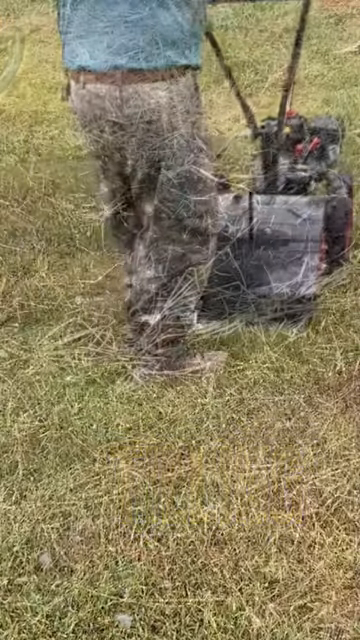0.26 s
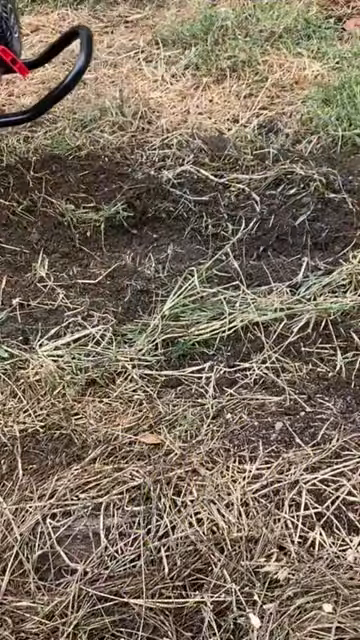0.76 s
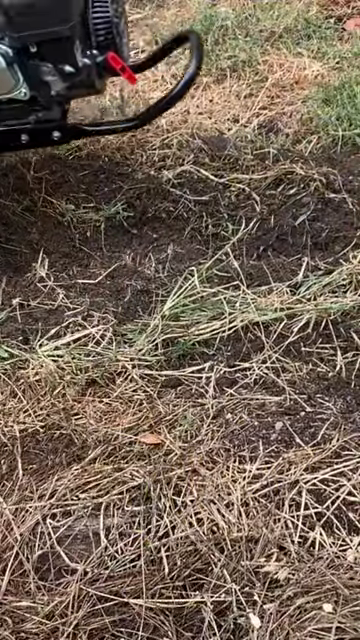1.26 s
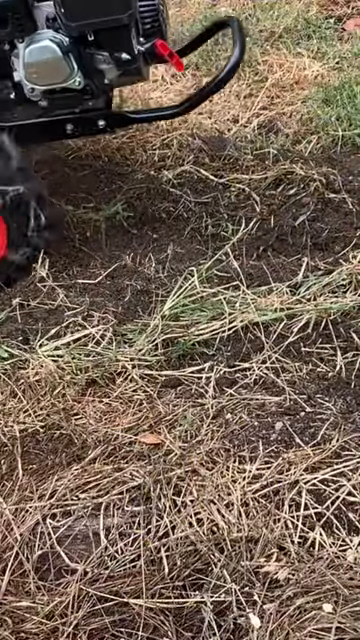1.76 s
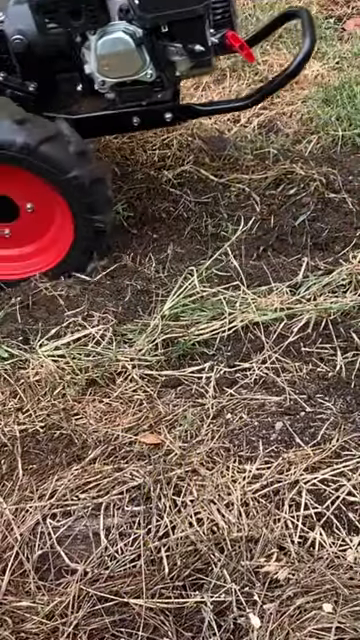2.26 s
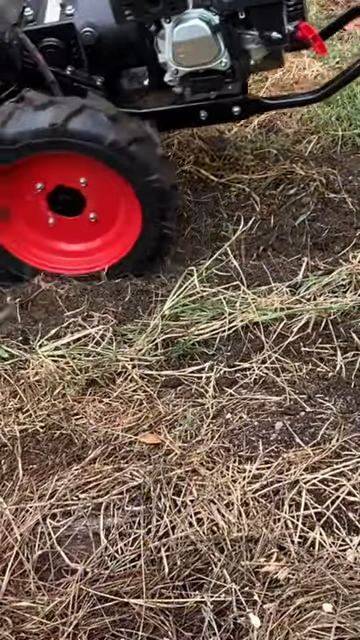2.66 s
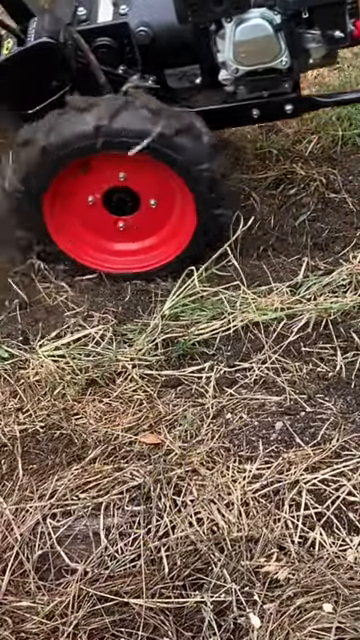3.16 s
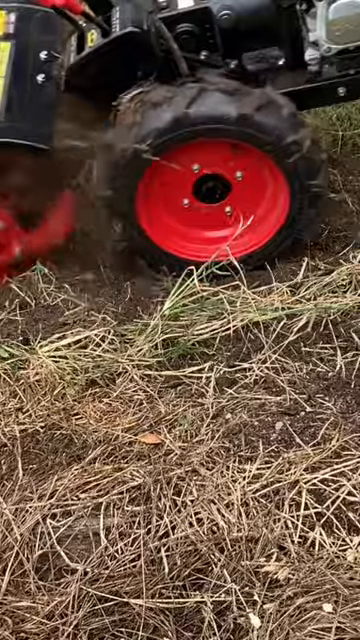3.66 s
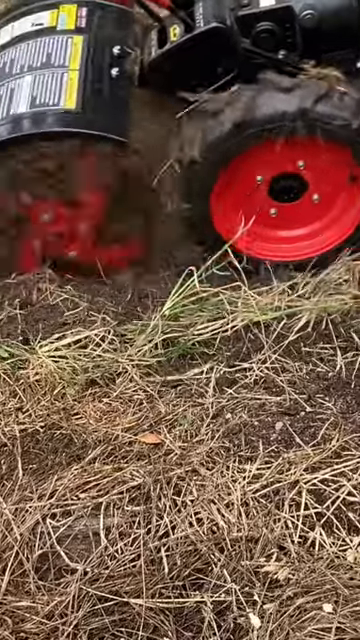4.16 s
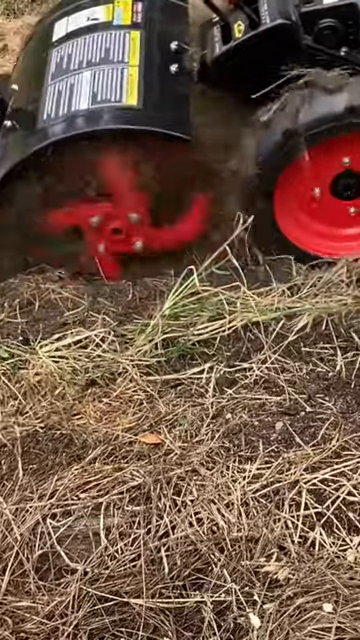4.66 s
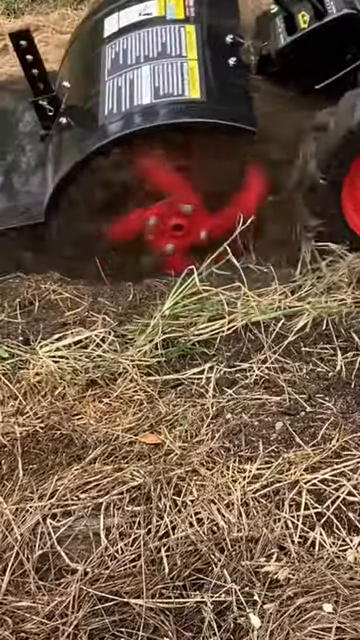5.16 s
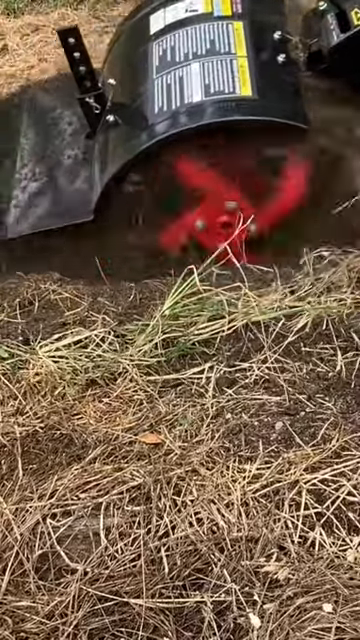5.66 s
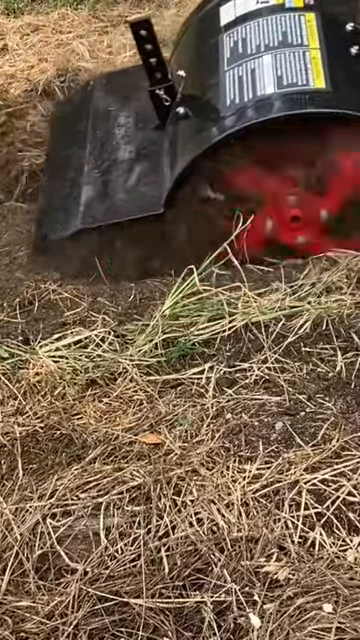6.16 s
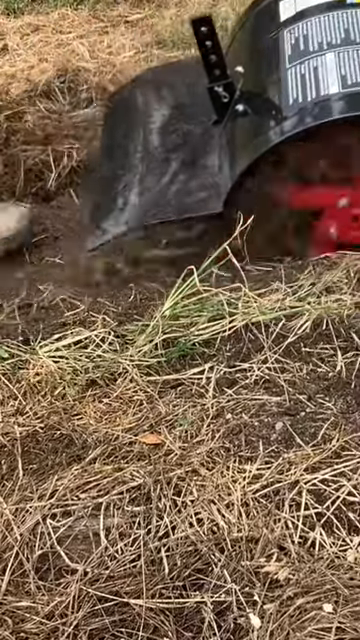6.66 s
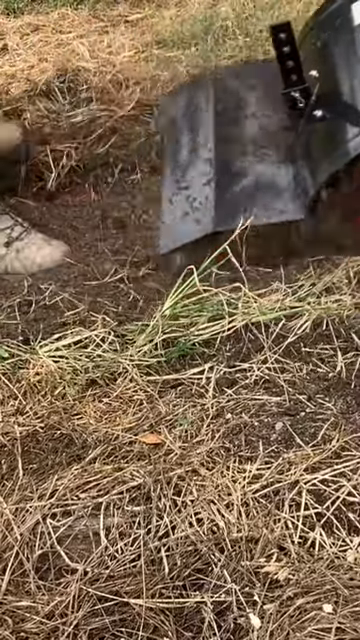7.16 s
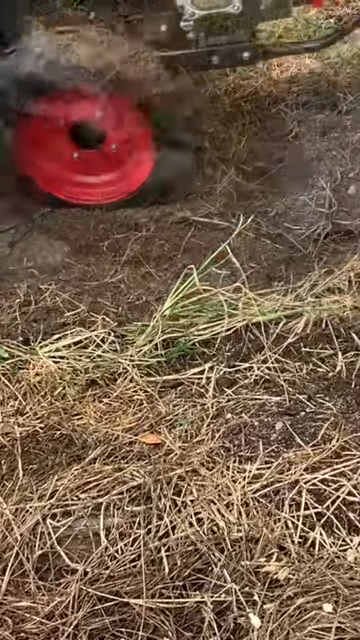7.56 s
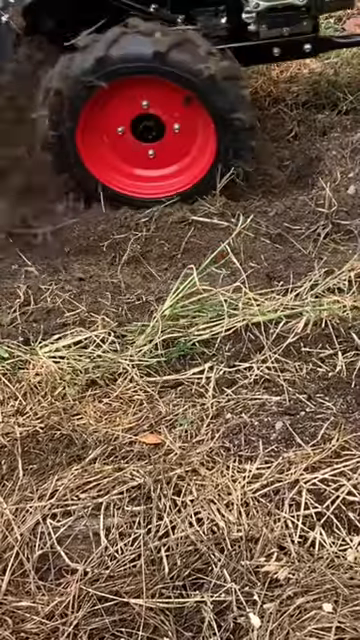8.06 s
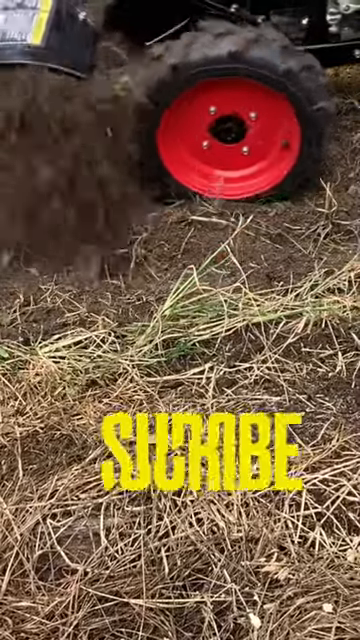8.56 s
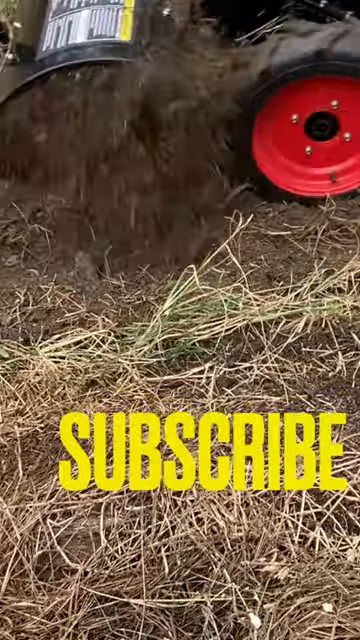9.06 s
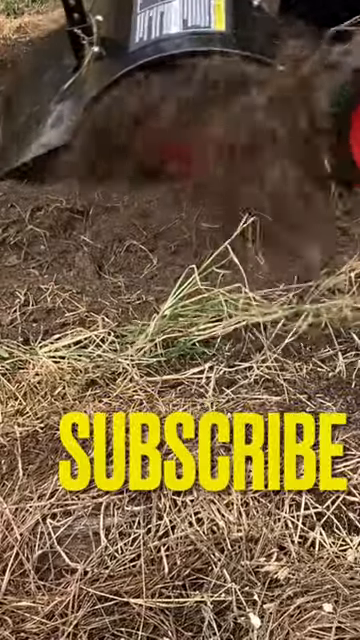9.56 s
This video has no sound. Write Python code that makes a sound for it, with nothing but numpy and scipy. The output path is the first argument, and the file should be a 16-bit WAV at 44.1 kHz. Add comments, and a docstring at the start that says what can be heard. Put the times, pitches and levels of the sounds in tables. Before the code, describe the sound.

A small four-stroke garden tiller works dry grass and soil very near a small stereo microphone. After half a second of low exhaust putter, its steady rapid chug turns harsh and rattly. Grit hisses over it, with scattered clanks, two or three hard early strikes and brief raspy scrapes. Near the end a second close pass fades in stronger, with denser knocks. Dry open air, never stopping.

```python
"""Tiller on dry grass

A single-cylinder four-stroke tiller is heard from behind, then passes close twice; the three scenes cross-fade.
Each firing puffs gas through the muffler, cracks, and knocks the sheet metal into a rattle.
Tines throw soil, straw and stones: grains hiss, and blows ring the guard's modes.
A two-port microphone colours it all; its gain control dips after loud strikes."""
import sys
import numpy as np
from scipy import signal
from scipy.fft import rfft, irfft
from scipy.io import wavfile
from scipy.ndimage import uniform_filter1d

SR = 44100
rng = np.random.default_rng(int(sys.argv[2]) if len(sys.argv) > 2 else 0)


def unload_wav(signal):
    """Save mono or channel-first audio to the path in sys.argv[1] as 16-bit WAV at rate SR, clipped to [-1, 1]."""
    wavfile.write(
        sys.argv[1],
        SR,
        np.round(np.clip(np.atleast_2d(signal).T, -1, 1) * 32767).astype(np.int16),
    )


N = 432621
TIME = np.arange(N) / SR
BINS_HZ = np.arange(N // 2 + 1) * SR / N

# cross-fades from each scene to the next: start_s, end_s
FADES = ((.17, 0.55), (7.3, 7.66))
# colour of grit and straw on the guard: pitch_hz, level_db (relative, per Hz)
SPRAY_COLOUR = [(1760, -32), (3000, -3), (3640, 2.5), (4350, -5), (5420, -4.5), (8380, 2.5), (9460, 5.5),
                (10900, 2.5), (11900, -22), (13200, -5.5), (15300, -6.5), (16200, -27), (16500, -43)]


def from_db(db):
    """Gain of a dB value."""
    return 10 ** (np.asarray(db) / 20)


def rms_one(x):
    """Scale to rms 1."""
    return x / np.sqrt(np.mean(x ** 2) + 1e-20)


def at_bins(points):
    """Read a (Hz, value) table on a log axis at every FFT bin."""
    hz, value = np.transpose(points)
    return np.interp(np.log(BINS_HZ + 1), np.log(hz + 1), value)


def along(curve):
    """Read the columns of a (s, ..) table at every sample."""
    s, *columns = np.transpose(curve)
    return [np.interp(TIME, s, column) for column in columns]


def colour(x, spectrum):
    """Filter by a smooth spectrum given as (Hz, dB)."""
    return irfft(rfft(x) * from_db(at_bins(spectrum)), N)


def ring(clicks, hz, t60):
    """A two-pole resonance: each unit click starts a sine of height 1 that dies by 60 dB in t60 seconds."""
    radius = from_db(-60 / (t60 * SR))
    angle = 2 * np.pi * hz / SR
    # the tiny offset keeps the filter out of denormal numbers
    return signal.lfilter([0, np.sin(angle)], [1, -2 * radius * np.cos(angle), radius ** 2], clicks + 1e-18)


def dying(clicks, t60):
    """Each click becomes an envelope that jumps up and dies by 60 dB in t60 seconds."""
    return signal.lfilter([1], [1, -from_db(-60 / (t60 * SR))], clicks + 1e-18)


def drift(rate_hz):
    """Slow random wander of rms 1: noise smoothed by two equal poles at a fortieth of the sample rate."""
    pole = np.exp(-80 * np.pi * rate_hz / SR)
    noise = rng.standard_normal(N // 40 + 2002)
    slow = signal.lfilter([1], [1, -2 * pole, pole ** 2], noise)[2000:]  # settled part only
    return np.interp(np.arange(N) / 40, np.arange(len(slow)), rms_one(slow))


def clicks_at(seconds, sizes):
    """Single-sample clicks of given sizes at given times."""
    at = np.round(seconds * SR).astype(int)
    inside = (at >= 0) & (at < N)
    out = np.zeros(N)
    np.add.at(out, at[inside], sizes[inside])
    return out


def grains(per_s, spread_db):
    """Random clicks of either sign and uneven size, scaled to rms 1."""
    sizes = from_db(spread_db * np.minimum(rng.exponential(1, N), 5))
    sizes = sizes * rng.choice([-1, 1], N)
    return rms_one(sizes * (rng.random(N) < per_s / SR))


def firings(speed, first_cycles):
    """The engine fires whenever its summed speed completes a cycle, a little early or late as tines bite unevenly."""
    hunt_ms = 0.3  # rms
    s, per_s = np.transpose(speed)
    t = np.arange(s[0], s[-1], 1 / SR)
    cycles = np.cumsum(np.interp(t, s, per_s)) / SR
    before = s[0] - (1 - first_cycles) / per_s[0]
    even = np.r_[before, np.interp(np.arange(first_cycles, cycles[-1]), cycles, t)]
    return even + hunt_ms / 1000 * np.interp(even, TIME, drift(4))


def scenes():
    """Firing times and equal-power cross-fade gain of each of the three scenes."""
    # engine speed heard from behind: time_s, firings_per_s
    speed_behind = [(0.0, 25.42), (0.55, 25.25)]
    # engine speed on the first close pass: time_s, firings_per_s
    speed_pass_one = [(0.3, 24.57), (0.8, 23.72), (1.07, 22.18), (1.3, 24.16), (1.85, 24.79), (2.4, 22.81),
                      (2.75, 24.21), (3.45, 23.96), (3.73, 21.17), (4.05, 23.86), (4.3, 23.38), (4.9, 23.8),
                      (5.25, 24.06), (5.85, 23.69), (6.86, 23.66), (7.55, 18.67)]
    # engine speed on the second close pass: time_s, firings_per_s
    speed_pass_two = [(7.3, 23.56), (7.7, 24.53), (8.1, 24.22), (8.5, 23.63), (8.75, 24.16), (9.3, 24.28),
                      (9.81, 24.81)]
    # how far each scene's speed runs before its first whole firing: behind_cycles, one_cycles, two_cycles
    first_firing = (.355, .295, .833)
    second, third = (np.interp(TIME, fade, [0, np.pi / 2]) for fade in FADES)
    gains = np.cos(second), np.sin(second) * np.cos(third), np.sin(third)
    speeds = speed_behind, speed_pass_one, speed_pass_two
    return [(firings(speed, first), gain) for speed, first, gain in zip(speeds, first_firing, gains)]


def exhaust(fired, puffs, muffler, puff_db=1.0):
    """Gas puffs of every cycle, uneven in strength, ring the muffler's modes; rms 1 while running."""
    cycle_db = -0.05  # spread shared by all puffs of a cycle; puff_db is the spread of each puff
    chance = rng.standard_normal((len(fired), len(puffs) + 1))
    strength = from_db(cycle_db * chance[:, :1] + puff_db * chance[:, 1:])
    gas = sum(clicks_at(fired + ms / 1000, size * strength[:, k]) for k, (ms, size) in enumerate(puffs))
    sound = sum(size * ring(gas, hz, t60) for hz, size, t60 in muffler)
    start, stop = int(max(fired[0], 0) * SR), int(fired[-1] * SR)
    return sound / np.std(sound[start:stop])


def thumping(behind, one, two):
    """Exhaust of the three scenes, stronger from behind where the outlet points."""
    # gas puffs from behind: after_firing_ms, signed_strength
    puffs_behind = [(3.2, -0.091), (7.96, -0.31), (13.2, -0.073), (19.0, 0.19)]
    # muffler modes from behind: pitch_hz, signed_strength, t60_s
    muffler_behind = [(66, -0.094, 0.11), (146, 0.27, 0.033), (247, 0.05, 0.12), (610, 0.04, 0.0072)]
    # gas puffs close by: after_firing_ms, signed_strength
    puffs_beside = [(.57, .95), (3.64, -1.83), (12.7, -1.1), (13.56, 1.8), (32.05, .57)]
    # muffler modes close by: pitch_hz, signed_strength, t60_s
    muffler_beside = [(66, -.3, .15), (102, .51, .082), (168, -1.32, .009), (300, -.11, .11),
                      (700, -.2, .008)]
    thump_behind = from_db(4.5) * exhaust(behind[0], puffs_behind, muffler_behind, puff_db=-0.3)
    thump_one = exhaust(one[0], puffs_beside, muffler_beside)
    thump_two = exhaust(two[0], puffs_beside, muffler_beside)
    return behind[1] * thump_behind + one[1] * thump_one + two[1] * thump_two


def knocking(fired):
    """One click for each blow that shakes the sheet metal in a cycle, uneven in time and strength."""
    # blows of one cycle: after_firing_ms, level_db, cycle_to_cycle_spread_db
    knock_table = [(-6, -10.5, 5), (0.5, -6.5, 1.5), (13, -28, -1.5)]
    jitter_ms = 0.18
    chance = rng.standard_normal((len(fired), len(knock_table), 2))
    out = 0
    for k, (ms, db, spread_db) in enumerate(knock_table):
        late_ms = ms + jitter_ms * chance[:, k, 0]
        out = out + clicks_at(fired + late_ms / 1000, from_db(db + spread_db * chance[:, k, 1]))
    return out


def rattle(knocks):
    """Each knock is a dying noisy shake over a chatter of loose parts; the engine shroud rings with both."""
    # resonances of the engine shroud: pitch_hz, width_hz, level_db
    casing = [(1070, 120, -6), (1485, 28, 0.5), (2510, 47, -2)]
    # colour of the rattle: pitch_hz, level_db (relative, per Hz)
    rattle_colour = [(150, -8.5), (330, -3), (600, -2), (1300, 0), (2230, -4.5), (2900, -9), (3620, -15.5),
                     (4370, -8), (5600, -49)]
    steady_db, shroud_db = -8, 0.5
    chatter = grains(per_s=4000, spread_db=2.0) * from_db(steady_db + 2.0 * drift(12))
    shaken = rng.standard_normal(N) * dying(knocks, t60=0.055) + chatter
    shroud = sum(from_db(db) * signal.lfilter(*signal.iirpeak(hz, hz / width, fs=SR), shaken)
                 for hz, width, db in casing)
    return rms_one(colour(shaken + from_db(shroud_db) * shroud, rattle_colour))


def spray(knocks):
    """Grit and straw pelt the guard in clumps; loose parts buzz with each knock."""
    steady_db, clumps_db = -7, 5.5
    pelting = grains(per_s=7000, spread_db=3.5) * from_db(steady_db + clumps_db * drift(25))
    buzz = rng.standard_normal(N) * dying(knocks, t60=0.1)
    return rms_one(colour(pelting + buzz, SPRAY_COLOUR))


def cooling_air():
    """Smooth noise of the cooling air, brighter than the spray; rms 1."""
    # treble tilt over the spray's colour: pitch_hz, level_db
    hiss_tilt = [(9000, -2), (13000, 0)]
    return rms_one(colour(colour(rng.standard_normal(N), SPRAY_COLOUR), hiss_tilt))


def part_ringing(fired, ms, hz, t60, jitter_ms=0.31, spread_db=4.0):
    """A part struck once a cycle rings, a little uneven in time; the blow has an upper limit."""
    chance = rng.standard_normal((len(fired), 2))
    sizes = from_db(spread_db * np.minimum(chance[:, 1], 1))
    return ring(clicks_at(fired + (ms + jitter_ms * chance[:, 0]) / 1000, sizes), hz, t60)


def popping(cylinder):
    """Short decaying tones of parts that ring at nearly fixed moments of each cycle."""
    # ringing parts: after_firing_ms, pitch_hz, t60_s, level_db (relative)
    pop_table = [(0.97, 630, 0.012, 3), (30, 475, 0.013, -2), (-0.5, 790, 0.035, -3),
                 (-1, 660, 0.047, -25.5)]
    return sum(gain * from_db(db) * part_ringing(fired, ms, hz, t60, jitter_ms=0.06, spread_db=1.5)
               for fired, gain in cylinder for ms, hz, t60, db in pop_table)


def valve_tick(cylinder):
    """The valve rings once a cycle, always equally hard but loose in time."""
    # valve: after_firing_ms, pitch_hz, t60_s
    valve = (1.2, 2570, .022)
    return sum(gain * part_ringing(fired, *valve, jitter_ms=0.6, spread_db=0.0) for fired, gain in cylinder)


def muffler_shield(cylinder):
    """The muffler shield rings once a cycle under very uneven blows."""
    # shield: after_firing_ms, pitch_hz, t60_s
    plate = (-3.5, 1490, .025)
    return sum(gain * part_ringing(fired, *plate, spread_db=6.0) for fired, gain in cylinder)


def tones(fired):
    """Clean multiples of the firing rate glide with the engine, each wavering slowly in level."""
    # steady tones: multiple_of_firing_rate, level_db (over engine level)
    engine_tones = [(10, -19), (13, -35), (16, -20.5), (22, -18.5), (15, -23)]
    waver_db = 4.5  # rms
    cycles = np.interp(TIME, fired, np.arange(len(fired)))
    return sum(from_db(db + waver_db * drift(5.7)) * np.sin(2 * np.pi * multiple * cycles)
               for multiple, db in engine_tones)


def crack(fired):
    """A short noise burst after each firing: the difference of a slow and a fast decay swells, then dies."""
    blows = clicks_at(fired + 0.3 / 1000, from_db(2.5 * rng.standard_normal(len(fired))))
    return (dying(blows, t60=0.022) - dying(blows, t60=0.008)) * rng.standard_normal(N)


def cracking(one, two):
    """Sharp cracks of the close passes, strongest while the cylinder faces the microphone."""
    # crack level: time_s, level_db
    crack_level = [(0.3, -40), (0.9, -30), (1.7, -36.5), (2.6, -37), (3.9, -32), (5.0, -38.5), (7.3, -33.5),
                   (8.0, -34.5), (9.81, -37.5)]
    # colour of the crack: pitch_hz, level_db (relative, per Hz)
    crack_colour = [(400, -40), (900, 3.5), (2000, 0.5), (2900, -5), (3600, -52), (4400, 2.5), (5600, -15),
                    (8800, 2), (11000, -13.5), (12000, 0), (14000, -6.5), (16500, -35)]
    bursts = one[1] * crack(one[0]) + two[1] * crack(two[0])
    return from_db(along(crack_level)[0]) * rms_one(colour(bursts, crack_colour))


def strikes(rows):
    """Each strike is a blow and a short shower of debris: both drive the guard's modes, and grit hisses above."""
    # modes of the guard: pitch_hz, level_db (relative), t60_s
    guard = [(760, 12, .045), (1250, -3, .03), (1500, -2, .035), (1850, -1, .035), (2100, 0, .03),
             (2400, -1, .035), (2650, 0, .04), (2980, 0, .04), (3300, -3, .035)]
    ring_db, blow_db, scatter_db, snap_db = -27, 21, -7, -4.5
    reach_db = 14  # lost per octave away from the favoured pitch
    swell_ms = 3.51  # the modes start one after another within this time
    s, clang_db, grit_db, favoured_hz = np.transpose(rows)
    uneven_db = 3.0 * rng.standard_normal((len(s), len(guard)))
    starts = s[:, None] + swell_ms / 1000 * rng.random((len(s), len(guard)))
    snaps = clicks_at(s, from_db(grit_db))
    grit = dying(snaps, t60=0.088) + from_db(snap_db) * dying(snaps, t60=0.017)
    clang = 0
    for k, (hz, db, t60) in enumerate(guard):
        # where the stone lands decides which modes speak
        lost_db = reach_db * np.abs(np.log2(hz / favoured_hz))
        blows = clicks_at(starts[:, k], from_db(clang_db + uneven_db[:, k] - lost_db))
        shower = dying(blows, t60=0.065) * rng.standard_normal(N)
        clang = clang + from_db(db + ring_db) * ring(from_db(blow_db) * blows + shower, hz, t60)
    band = signal.butter(2, [1200, 3400], "band", fs=SR, output="sos")
    mid_noise = rms_one(signal.sosfilt(band, rng.standard_normal(N)))
    scatter = from_db(scatter_db) * dying(clicks_at(s, from_db(clang_db)), t60=0.095) * mid_noise
    hiss = rms_one(colour(grains(per_s=9000, spread_db=2.0), SPRAY_COLOUR))
    return clang + scatter + grit * hiss


def debris(fired):
    """Strike rows for small debris shaken off the guard by a random tenth of the firings."""
    share, clang_db, grit_db, spread_db = 0.1, -30, -31, 3.0
    luck = rng.random((len(fired), 2))
    chance_db = spread_db * rng.standard_normal((len(fired), 2))
    favoured_hz = 1500 + 900 * luck[:, 1]
    rows = np.c_[fired, clang_db + chance_db[:, 0], grit_db + chance_db[:, 1], favoured_hz]
    return rows[luck[:, 0] < share]


def scrapes():
    """Tines drag through crust and stalks: each scrape is a run of coarse grains in a broad band of its own."""
    # scrapes: start_s, length_s, level_db (rms before its rise and fall are mixed in), pitch_hz
    scrape_table = [(2.066, 0.012, -23, 2000), (5.72, 0.042, -26.5, 3080), (5.926, 0.025, -27, 2000),
                    (6.67, 0.02, -27, 3320), (6.883, 0.02, -24, 2000), (6.957, 0.044, -24.5, 2720),
                    (8.6, 0.062, -22, 2550), (9.252, 0.037, -21.5, 2850), (9.544, 0.049, -23, 1830)]
    edge_s, width = 0.0083, 1.85  # rise time; ratio that sets the band edges
    out = np.zeros(N)
    rough = grains(per_s=1200, spread_db=3.0)
    for s, length, db, hz in scrape_table:
        times = [s - edge_s, s, s + length, s + length + 3 * edge_s]
        a, b = int(times[0] * SR), int(times[-1] * SR)
        shape = np.interp(TIME[a:b], times, [0.43, 1, 0.51, 0.14])
        band = signal.butter(2, [hz / width, hz * width ** 0.5], "band", fs=SR, output="sos")
        out[a:b] += from_db(db) * shape * rms_one(signal.sosfilt(band, rough[a:b]))
    return out


def two_ports(x, diffuse):
    """Each port hears every frequency with its own level and phase; scattered sound has opposite sign in them."""
    # phase between the ports: pitch_hz, left_lead_rad
    port_phase = [(0, 0), (340, -.3), (600, -1.0), (860, -1.2), (1640, -.1), (2320, .2), (2900, -.3),
                  (3700, -3.7), (4390, -4.2), (6030, -2.7), (8180, 0), (9470, .5), (11280, 3.0),
                  (13000, 3.3), (14000, 6.2), (16500, 6.3)]
    # balance of the ports: pitch_hz, left_over_right_db
    port_balance = [(60, 1.4), (260, 1.1), (430, 2.1), (780, -1), (1200, -6), (1900, -5.5), (3190, 0),
                    (4390, -2.8), (6030, 0), (16000, 0)]
    lead = np.interp(BINS_HZ, *np.transpose(port_phase))
    half = from_db(at_bins(port_balance) / 2) * np.exp(0.5j * lead)  # half the difference to each port
    return np.array([irfft(rfft(x + diffuse) * half, N), irfft(rfft(x - diffuse) / half, N)])


def scene():
    """Engine, soil and stones at the two ports of the microphone."""
    # loudness as the machine passes: time_s, engine_db, spray_db
    work = [(0.0, -30, -40), (0.3, -31, -36.5), (0.55, -30.5, -35), (0.95, -26, -31), (1.8, -27.5, -30),
            (2.05, -30, -34), (2.5, -27, -27), (2.85, -28.5, -32), (4.07, -28.5, -30.5), (6.78, -28.5, -29),
            (7.43, -30, -34), (7.81, -25, -31), (8.3, -24, -30), (9.48, -25, -28.5), (9.81, -27, -31)]
    # parts that ring once a cycle, the tick strongest as the cylinder faces the microphone:
    # time_s, tick_db, shield_db (both before a fixed boost)
    ticking = [(0.3, -32.5, -34), (0.95, -25, -20), (2.0, -32.5, -32), (3.5, -28.5, -38),
               (4.3, -29.5, -28.5), (6.75, -46, -23.5), (7.45, -57, -46), (7.85, -28, -42), (8.7, -32, -18),
               (9.5, -42, -28)]
    # stones, stalks and clods on the guard: start_s, clang_db, grit_db (both relative), favoured_pitch_hz
    strike_table = [(0.417, -38, -22, 1850), (0.512, -23, -21, 1900), (0.593, -33, -20, 1710),
                    (0.765, -19, -42, 2150), (0.938, -23, -37, 2200), (1.027, -25, -28, 2300),
                    (1.063, -19, -22.5, 2000), (1.118, -21, -30, 2400), (1.161, -29, -25, 2550),
                    (1.204, -17, -24, 1870), (1.566, -30, -20, 2280), (1.628, -15.5, -20, 2300),
                    (1.691, -4.5, -12.5, 1970), (1.89, -36, -16, 1410), (2.084, -10.5, -11.5, 2550),
                    (2.272, -10, -16.5, 2700), (2.435, -15, -26, 1500), (2.539, -27, -21, 2000),
                    (2.767, -22, -23, 1860), (2.946, -16, -20.5, 2160), (3.327, -20.5, -18.5, 2110),
                    (3.446, -5, -9, 2950), (3.943, -20, -28, 2280), (4.017, -22, -20, 2000),
                    (4.538, -15, -15.5, 2730), (4.864, -17.5, -21, 1880), (5.048, -25, -19, 2000),
                    (5.281, -36, -21.5, 1550), (5.41, -20, -17.5, 1540), (5.682, -32, -14.5, 2520),
                    (5.947, -28, -21, 1490), (6.416, -21, -12, 2730), (6.465, -22, -17.5, 2800),
                    (6.503, -24, -15.5, 1960), (6.65, -30, -15.5, 1500), (6.702, -23, -19, 2310),
                    (6.871, -15, -28, 1880), (6.954, -18.5, -19.5, 2150), (7.196, -30, -19.5, 1750),
                    (7.258, -41, -20.5, 1480), (7.725, -15.5, -21, 1800), (7.873, -25, -29, 1800),
                    (7.889, -35, -15.5, 2000), (8.094, -28, -20, 2197), (8.162, -15, -24, 2500),
                    (8.265, -31, -18, 2540), (8.313, -17, -18.5, 1940), (8.452, -17, -23, 2230),
                    (8.489, -19, -16.5, 2160), (8.617, -13, -17.5, 2700), (8.923, -12.5, -17.5, 2520),
                    (9.245, -21, -31, 2270), (9.268, -23, -20, 2380), (9.405, -16, -31, 1450),
                    (9.551, -19, -13.5, 1970), (9.627, -39, -19.5, 2000)]
    # share of scattered sound: pitch_hz, level_db
    scatter_share = [(250, -8), (600, -17), (1200, -15), (3000, -6.5), (8000, -11.5), (13000, -15.5)]
    # the machine's place between the ports, wandering a little left and right: time_s, left_over_right_db
    place = [(0, 0.5), (1.2, 1), (3.0, 0.1), (6.5, -0.7), (7.9, 0.2), (9.81, -1)]
    engine_db, spray_db = along(work)
    tick_db, shield_db = along(ticking)
    behind, one, two = scenes()
    thump = thumping(behind, one, two)
    # the machine's body hides the cylinder from behind
    cylinder = (behind[0], behind[1] * from_db(-21)), one, two
    knocks = sum(gain * knocking(fired) for fired, gain in cylinder)
    pops = popping(cylinder)
    tick = valve_tick(cylinder)
    shield = muffler_shield(cylinder)
    # ground and grass scatter a second share of the noise, with its own random grains, from all sides
    direct, scattered = (from_db(engine_db) * rattle(knocks) + from_db(spray_db) * spray(knocks)
                         + from_db(-42.5) * cooling_air() for path in range(2))
    engine = from_db(engine_db + 1.06) * thump + from_db(engine_db + 9.0) * pops
    engine += from_db(tick_db + 8.5) * tick + from_db(shield_db + 1.5) * shield
    engine += from_db(engine_db) * (one[1] * tones(one[0]) + two[1] * tones(two[0]))
    engine += cracking(one, two)
    # close-pass firings, each stretch of time counted once
    close = np.r_[one[0][one[0] > FADES[0][1]], two[0][two[0] > one[0][-1]]]
    hits = strikes(np.r_[strike_table, debris(close)])
    pan = from_db(along(place)[0] * [[0.5], [-0.5]])
    return pan * two_ports(engine + direct + hits + scrapes(), colour(scattered, scatter_share))


def record(dry):
    """Rumble cut, gain control that ducks after loud strikes, rounded peaks, steep top cut."""
    x = signal.sosfiltfilt(signal.butter(3, 34, "high", fs=SR, output="sos"), dry)
    level_db = 10 * np.log10(uniform_filter1d(np.mean(x ** 2, axis=0), size=441) + 1e-12)  # over 10 ms
    release = 16.5 * TIME  # the held peak level falls by 16.5 dB per s
    held_db = np.maximum.accumulate(level_db + release) - release
    over_db = np.maximum(held_db + 13.5, 0)  # threshold -13.5 dB
    duck_db = signal.lfilter([0.0012], [1, -1 + 0.0012], 0.7 * over_db)  # eased in
    x = np.tanh(x * from_db(-duck_db))
    return signal.sosfilt(signal.cheby2(14, 60, 15900, fs=SR, output="sos"), x)  # 60 dB down from 15.9 kHz


dry = scene()
out = record(dry)
unload_wav(out)
```